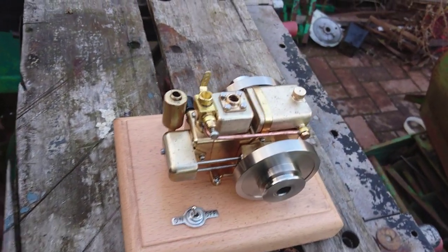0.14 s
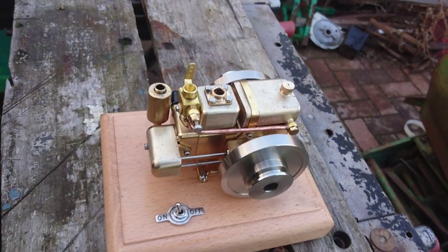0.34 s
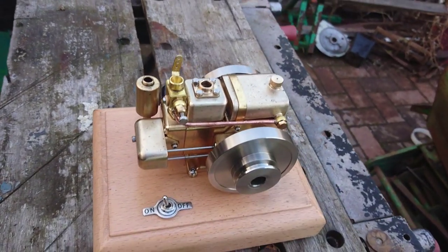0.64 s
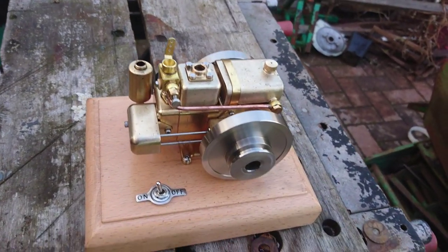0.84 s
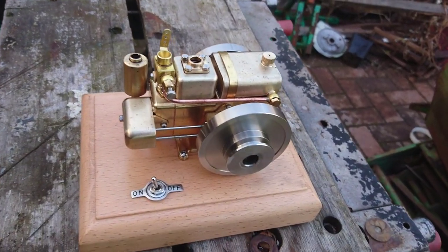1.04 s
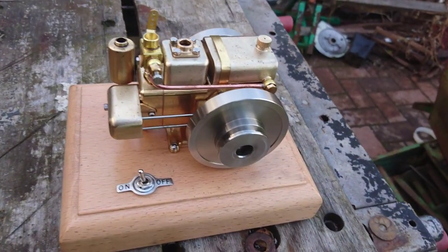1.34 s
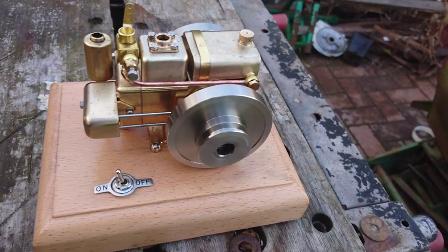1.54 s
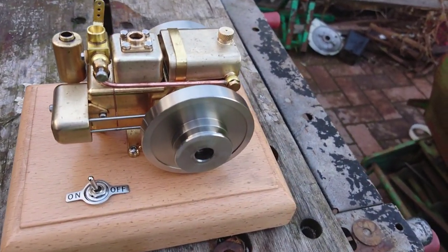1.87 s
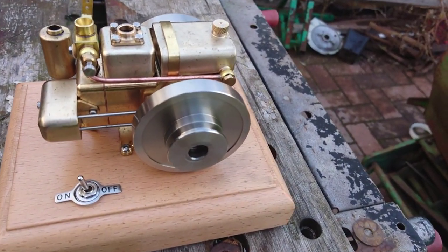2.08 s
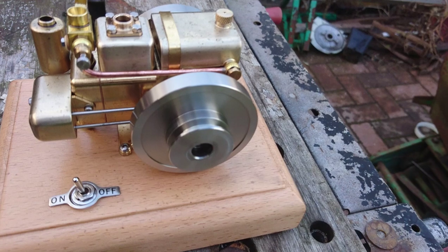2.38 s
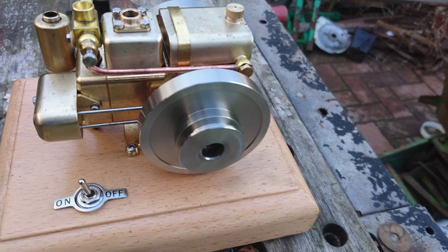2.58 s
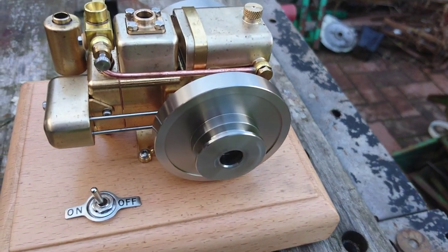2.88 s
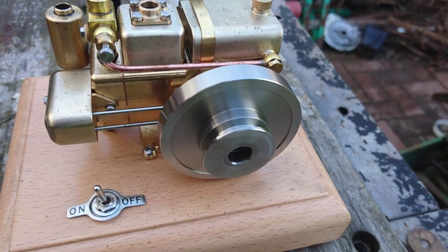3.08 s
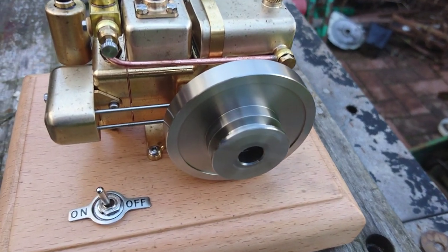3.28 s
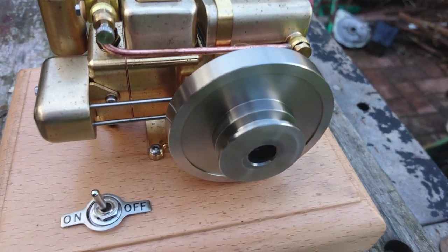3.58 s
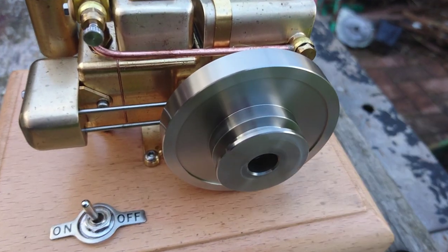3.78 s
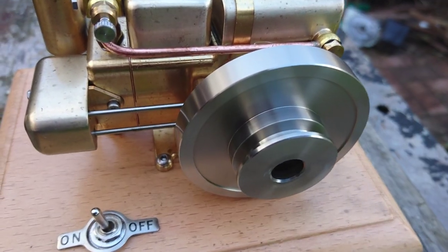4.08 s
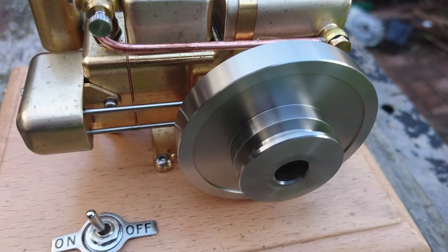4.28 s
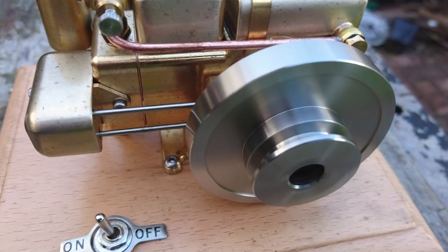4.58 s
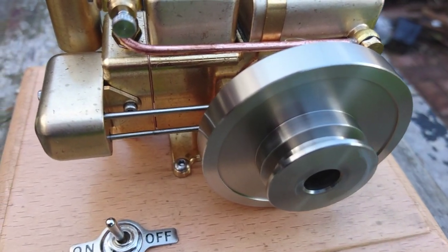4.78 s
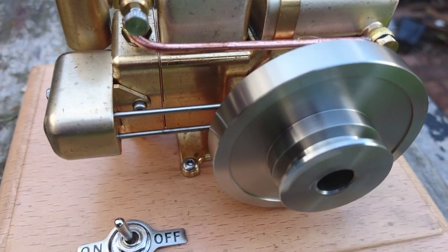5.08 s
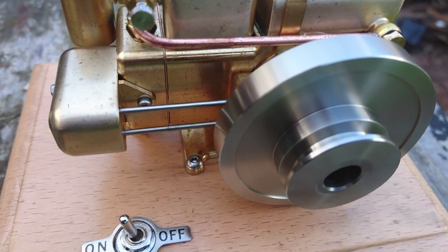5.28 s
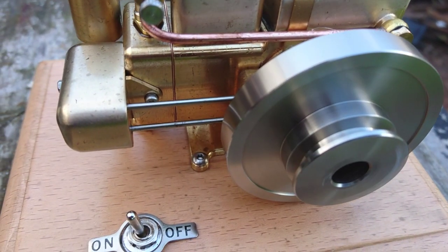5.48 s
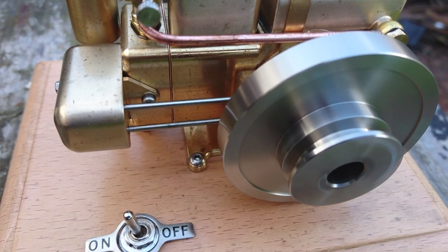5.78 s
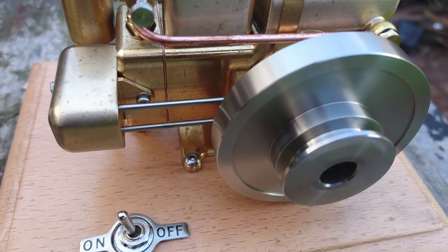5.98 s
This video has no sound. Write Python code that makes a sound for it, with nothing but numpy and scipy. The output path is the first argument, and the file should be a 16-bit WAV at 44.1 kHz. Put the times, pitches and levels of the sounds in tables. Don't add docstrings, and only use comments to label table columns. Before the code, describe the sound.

A small model engine idles on a wooden base outdoors, already running. Sharp, dry exhaust pops come irregularly, about four a second, over a steady rattle of valve knocks and ticks at roughly fifteen cycles a second, with short air hisses, soft gulps and gear whirr. It sits to the left and grows louder and brighter as the small handheld microphone moves in. Faint wind rumble and distant hush lie beneath.

```python
import sys
import numpy as np
from scipy import signal
from scipy.fft import rfft, irfft, next_fast_len
from scipy.io import wavfile
from scipy.ndimage import map_coordinates

SR = 44100
rng = np.random.default_rng(int(sys.argv[2]) if len(sys.argv) > 2 else 0)


def store_wav(level_fs):
    pcm = np.round(np.clip(np.atleast_2d(level_fs), -1, 1) * 32767)
    wavfile.write(sys.argv[1], SR, pcm.T.astype(np.int16))


def volts_from_db(level):
    exponent = np.asarray(level, float) / 20
    return 10 ** exponent


N = 270333

# (frequency [Hz], density [dB per Hz])
FAR_NOISE = [(30, 0), (120, -22), (250, -12), (600, -2), (2000, -20), (6000, -16.5), (10000, -23.5),
             (15500, -25)]
# (time [s], rumble [dB])
WIND_GUSTS = [(0.0, -59), (0.49, -61.5), (0.73, -50.5), (0.92, -56), (1.1, -51), (1.5, -59.5), (1.69, -60),
              (2.3, -68), (2.58, -58), (3.19, -62.5), (3.76, -58), (4.2, -55.5), (4.52, -63), (5.09, -58.5),
              (5.51, -56), (6.13, -62)]
# (frequency [Hz], density [dB per Hz])
WIND_COLOUR = [(20, -40), (40, 1.5), (55, 1), (90, -6.5), (120, -22), (200, -13), (500, -59), (2000, -58)]
# (frequency [Hz], 60 dB decay [s])
YARD_DECAY = [(200, 0.15), (2000, 0.19), (10000, 0.0087)]
# (time [s], gear whirr [dB], left-right [dB], nearness [dB])
APPROACH = [
    (0.0, -55.5, 3.5, -5),
    (0.41, -56.5, 3.5, -5),
    (1.71, -53.5, 5.5, -4),
    (2.06, -53.5, 7, -3.5),
    (2.59, -51, 6.5, -3),
    (4.06, -49, 8, -0.5),
    (4.27, -49.5, 8.5, 0),
    (5.51, -50, 9, 0.5),
    (5.58, -51.5, 8.5, 0.5),
    (6.13, -49.5, 7, -0.5),
]
# (frequency [Hz], density [dB per Hz])
GEAR_COLOUR = [(300, -19), (1000, -10.5), (1350, -13.5), (1720, -2.5), (1880, -21.5), (2070, -0.5),
               (2400, -9), (3200, -14.5), (5000, -17), (9000, -35), (16000, -44)]
# (frequency [Hz], density [dB per Hz])
INTAKE_COLOUR = [(500, -30), (1000, -14), (1750, 8), (2600, 0.5), (4000, -5.5), (6000, 2), (9500, -11.5),
                 (12500, -5), (15500, -6.5)]
# (frequency [Hz], density [dB per Hz])
JET_COLOUR = [(800, -7), (2200, -1.5), (3000, 2), (4800, -4), (6200, -7), (7600, -19), (11000, -18),
              (13000, -30), (15300, -14)]
# (time [s], boom [dB], crack [dB], sharpness [dB])
BANGS = [(0.1168, -17, -9, -4), (0.5508, -18, -14, 6), (0.7663, -17.5, -11.5, 3), (1.051, -17, -10.5, -1),
         (1.261, -16, -12, 1.5), (1.5348, -16.5, -10, -3.5), (1.7392, -15, -10, -3),
         (2.089, -15.5, -12, -3), (2.362, -15.5, -9, -2.5), (2.5608, -14.5, -10.5, -1),
         (2.9674, -14.5, -10.5, -3), (3.2354, -14, -9.5, -13.5), (3.4344, -12.5, -9, -6),
         (3.699, -12.5, -10.5, -1.5), (3.8945, -11.5, -9.5, 4), (4.1575, -12, -10, 3),
         (4.5577, -11.5, -9, 4.5), (4.7625, -11, -8.5, -0.5), (5.1156, -12, -11, 4),
         (5.3935, -11, -10, 0.5), (5.5976, -11.5, -7, -0.5), (5.8701, -11, -6.5, -0.5),
         (6.0717, -11, -9, 4.5)]
# (time [s], delay [samples])
PORT_DELAY = [
    (0, 7.8),
    (1.7, 13.5),
    (6.13, 15),
]
# (frequency [Hz], left-right [dB])
BODY_SHADOW = [(80, 10.5), (200, 3.5), (390, 8.5), (620, 10), (1000, 4), (1750, 13.5), (2400, 21.5),
               (3600, 7), (5500, 16.5), (8000, 12), (15000, 11)]
# (frequency [Hz], response [dB])
MIC_RESPONSE = [(20, -24), (45, -8), (110, -2), (250, 0), (13000, 0), (15200, 2.5), (15850, 2.5),
                (16050, -16), (16950, -26), (17150, -80)]

FULL_SCALE = 0.92
LEAD_S = 0.005
FIRED_BEFORE_S, FIRED_AFTER_S = -0.0948, 6.27
USUAL_CYCLE_S = 0.069
DRAG = 5.0
OPENS, SEATS, JITTER_S = 0.266, 0.478, 0.000291
KNEE_S, SOFTER_DB_PER_MS, LATER = 0.069, 1.5, 0.306
GULP_DB, GULP_GROWS, GULP_DB_PER_MS = -25, 1.21, -0.21
RING_SHIFT, RASP_SHIFT = -0.013, 0.022
BASS_HZ, BASS_DB, BASS_GROWS = 110, 2.5, 0.86
SHARP_HZ = 4300
WHISTLE_HZ = 8000
DIP_HZ, DIP_WIDE_HZ, DIP_DB = 1450, 430, -1
FAR_SMEAR, BASE_GROWS = -0.45, 0.6
OPEN_DB, SEAT_DB, KNOCK_GROWS, KNOCK_SCATTER_DB = -17, -18, 1.88, 1.1
HOT_DB = -1.5
CLUMPS_DB, SWAY_DB = 2.8, 0.9


def unit(x):
    return x / np.sqrt(np.mean(x ** 2) + 1e-20)


def along(points, hz):
    f, v = np.transpose(points)
    return np.interp(np.log(hz + 1), np.log(f + 1), v)


def over_time(knots, values):
    return np.interp(np.arange(N) / SR, knots, values)


def curves(rows):
    s, *columns = np.transpose(rows)
    return [over_time(s, column) for column in columns]


def nearness(s):
    return np.interp(s, *np.transpose(APPROACH)[[0, 3]])


def wobble(rate):
    knots = rng.standard_normal(int(N * rate / SR) + 4)
    return map_coordinates(knots, [np.arange(N) * rate / SR])


def filtered(x, response):
    m = next_fast_len(N + 8192)
    return irfft(rfft(x, m) * response(np.fft.rfftfreq(m, 1 / SR)), m)[..., :N]


def noise(spectrum, channels=1):
    return unit(filtered(rng.standard_normal((channels, N)), lambda hz: volts_from_db(along(spectrum, hz))))


def place(starts, db, shape, size=1400):
    first = np.ceil(starts * SR).astype(int)[:, None] + np.arange(size)
    t = np.abs(first / SR - starts[:, None])
    rows = volts_from_db(db)[:, None] * shape(t) * (first >= 0)
    return np.bincount(np.abs(first).ravel(), rows.ravel(), N + SR)[:N]


def bump(t, at, width):
    return np.exp(-0.5 * ((t - at) / width) ** 2)


def ring(peaks, db, hz, swell, power, scatter_db, detune, tail=0, tail_s=1):
    luck = rng.standard_normal((len(peaks), 3))
    pitch = hz * (1 + detune * luck[:, :1])

    def shape(t):
        burst = (t / swell * np.exp(1 - t / swell)) ** power
        ringing_on = tail * t / tail_s * np.exp(1 - t / tail_s)
        return (burst + ringing_on) * np.sin(2 * np.pi * pitch * t + luck[:, 1:2])

    return place(peaks - swell, db + scatter_db * luck[:, 2], shape)


def far_noise():
    return volts_from_db(-60.5) * noise(FAR_NOISE, channels=2)


def wind():
    gusts = noise(WIND_COLOUR, channels=3)
    level_db = curves(WIND_GUSTS)[0] + 2.5 + 2.0 * wobble(14.0)
    return volts_from_db(level_db) * (1.2 * gusts[0] + 0.81 * gusts[1:])


def yard(x):
    hz, t, z = signal.stft(rng.standard_normal((2, SR // 5)), SR, nperseg=256)
    decay = volts_from_db(-60 * t / along(YARD_DECAY, hz)[:, None])
    tail = signal.istft(z * decay, SR, nperseg=256)[1]
    late = np.pad(x, (120, 0))[None]
    echo = signal.fftconvolve(late, tail / np.linalg.norm(tail[0]), axes=1)[:, :N]
    return volts_from_db([[-27], [-32]]) * echo


def crank():
    firings = np.r_[FIRED_BEFORE_S, np.transpose(BANGS)[0], FIRED_AFTER_S]
    rows = []
    for s, gap in zip(firings, np.diff(firings)):
        k = np.arange(round(gap / USUAL_CYCLE_S))
        cycle = (1 + DRAG * (gap / len(k)) ** 2) ** k
        cycle = cycle * gap / cycle.sum()
        rows += zip(s + np.cumsum(cycle) - cycle, cycle, k == 0)
    return np.transpose([row for row in rows if FIRED_BEFORE_S < row[0] < N / SR])


def cams(s, cycle, fired):
    luck = rng.standard_normal((len(s), 4))
    slow = np.maximum(cycle - KNEE_S, 0)
    near = KNOCK_GROWS * nearness(s)
    opens = s + OPENS * cycle + JITTER_S * luck[:, 0]
    seats = s + SEATS * cycle + LATER * slow + JITTER_S * luck[:, 1]
    open_db = OPEN_DB + near + HOT_DB * fired + KNOCK_SCATTER_DB * luck[:, 2]
    seat_db = SEAT_DB + near - SOFTER_DB_PER_MS * slow * 1000 + KNOCK_SCATTER_DB * luck[:, 3]
    return opens, open_db, seats, seat_db


def gears(opens, seats, whirr_db):
    knots = np.transpose([opens - 0.012, seats + 0.0046, seats + 0.013, seats + 0.018]).ravel()
    load_db = over_time(knots, np.tile([-0.4, -0.5, 1.0, -5], len(opens)))
    uneven_db = CLUMPS_DB * wobble(260) + SWAY_DB * wobble(40)
    return volts_from_db(whirr_db + load_db + 5.5 + uneven_db) * noise(GEAR_COLOUR, channels=2)


def intake(opens, seats, near_db):
    knots = np.transpose([opens - 0.0055, opens - 0.0035, opens + 0.00099, seats - 0.004,
                          seats + 0.00033, seats + 0.0063, seats + 0.0064]).ravel()

    def flow(db, grows):
        stroke_db = over_time(knots, np.tile(db, len(opens)))
        return volts_from_db(stroke_db + grows * near_db - 41 + 2.4 * wobble(400) + 1.9 * wobble(8.5))

    air = noise(INTAKE_COLOUR, channels=2)
    high = filtered(air, lambda hz: 1 / (1 + (WHISTLE_HZ / (hz + 1)) ** 8))
    hiss = flow([-22, 5.5, 0.5, 2.5, 7.0, -3, -26], grows=1.01) * (air - high)
    whistle = flow([-35, -13, 3.0, 3.0, 5.5, -24, -40], grows=0.9) * high
    return hiss + whistle


def valves(opens, open_db, seats, seat_db):
    near = nearness(seats)
    smear = 0.5 * volts_from_db(2 * FAR_SMEAR * near)[:, None]
    base = ring(opens, open_db - 5.0 - FAR_SMEAR * near, 1750.5, swell=0.0033, power=8.1,
                scatter_db=0.36, detune=0.0068, tail=smear, tail_s=0.0037)
    base += ring(opens - 0.0008, open_db - 17, 1900, swell=0.002794, power=2.0, scatter_db=2.5, detune=0.02)
    base += ring(opens - 0.001, near - 34, 970, swell=0.002095, power=0.86, scatter_db=1.0, detune=0.029)
    base += ring(seats, seat_db - 2.5, 1833, swell=0.002158, power=7.0,
                 scatter_db=-0.35, detune=0.014, tail=0.27, tail_s=0.003)
    base += ring(seats, seat_db - 16.5, 2044, swell=0.00185, power=1.0, scatter_db=2.0, detune=0.018)
    base += ring(seats, near - 36, 483, swell=0.00075, power=1.0, scatter_db=1.5, detune=0.11)
    # (time [s], level [dB], frequency [Hz])
    ticks = [(opens - 0.0034, -36, 6300), (seats - 0.006, -37, 4300), (opens - 0.0037, -32, 3250),
             (opens - 0.0003, -33, 3500), (seats + 0.0053, -35, 3100), (seats - 0.0003, -28, 5950),
             (seats - 0.0012, -32, 4900), (seats + 0.00127, -33, 6500)]
    for s, db, hz in ticks:
        base += ring(s, near + db, hz, swell=0.000494, power=0.99, scatter_db=2.5, detune=0.042)
    return base


def pipe(t, hz, peak, width, sudden):
    start = 1 / (1 + np.exp((LEAD_S - t) / sudden))
    return start * bump(t - LEAD_S, peak, width) * np.cos(2 * np.pi * hz * (t - LEAD_S) - 0.3)


def cylinder(t):
    t = t - LEAD_S
    cycles = 335 * t * (1 + 39 * t + (39 * t) ** 4 / 5)
    return bump(t, 0.0096, width=0.0044) * volts_from_db(-60 * (t / 0.02) ** 12) * np.cos(2 * np.pi * cycles)


def gulps(s, cycle, fired):
    s, cycle = s[fired == 0], cycle[fired == 0]
    near = nearness(s)
    db = GULP_DB + GULP_GROWS * near + GULP_DB_PER_MS * (cycle - USUAL_CYCLE_S) * 1000

    def slaps(t):
        inrush = bump(t, LEAD_S, width=0.000071) - 0.44 * bump(t, LEAD_S + 0.00048, width=0.0002)
        return inrush + 0.69 * bump(t, LEAD_S + 0.00234, width=0.00015)

    low = place(s - LEAD_S, db + 0.09, lambda t: -pipe(t, 400, peak=0.0012, width=0.004, sudden=0.0012))
    base = ring(s + 0.00273, db - 3 + BASE_GROWS * near, 1702, swell=0.001796, power=0.9,
                scatter_db=2.0, detune=0.008)
    base += ring(s + 0.00194, db - 8.0, 2060, swell=0.00178, power=1.0, scatter_db=1.5, detune=0.036)
    rocker = ring(s - 0.0019, db - 11.0, 3050, swell=0.00028, power=0.63, scatter_db=6.5, detune=0.045)
    return low - place(s - LEAD_S, db + 5.5, slaps) + base + rocker


def jet():
    s, _, crack_db, _ = np.transpose(BANGS)
    rush = lambda t: volts_from_db(-60 * (t / 0.0028) ** 5) + volts_from_db(-11.5 - 60 * t / 0.049)
    return place(s + 0.00031, crack_db - 9, rush) * noise(JET_COLOUR, channels=2)


def bangs(near_db):
    s, boom_db, crack_db, sharp_db = np.transpose(BANGS)
    near = nearness(s)[:, None]

    def boom_shape(t):
        return pipe(t, 402.0, peak=0.00078, width=0.0032, sudden=0.0013) + 0.33 * cylinder(t)

    def push_shape(t):
        return bump(t, LEAD_S, width=0.00009) - 0.45 * bump(t, LEAD_S + 0.00026, width=0.00009)

    def shock_shape(t):
        total = 0
        # (frequency [Hz], gain, 60 dB decay [s])
        for hz, gain, t60 in [(3800, 1.4, 0.0012), (2138, 0.19, 0.023),
                              (2417, 0.19, 0.0076), (5420, 0.15, 0.012)]:
            total = total + gain * volts_from_db(-60 * t / t60) * np.sin(2 * np.pi * hz * (1 + RING_SHIFT * near) * t)
        return total

    boom = place(s - LEAD_S, boom_db + 0.055, boom_shape)
    push = place(s - LEAD_S, boom_db + 10.2, push_shape)
    push = filtered(push, lambda hz: volts_from_db(DIP_DB * bump(hz, DIP_HZ, DIP_WIDE_HZ)))
    shock = place(s + 0.0004166, crack_db + 6.5, shock_shape)
    rasp = np.zeros(N)
    # (delay [s], frequency [Hz], level [dB])
    for lag, hz, db in [(0.001254, 4777, 1.5), (0.001149, 3580, -6.5), (0.001398, 6000, -6)]:
        rasp_db = crack_db + db + np.sign(hz - SHARP_HZ) * sharp_db
        rasp += ring(s + lag, rasp_db, hz * (1 + RASP_SHIFT * near), swell=0.000613, power=5.8,
                     scatter_db=-1.1, detune=0.039)
    bass = filtered(boom + push, lambda hz: 1 / (1 + (hz / BASS_HZ) ** 2))
    boom = boom + (volts_from_db(BASS_DB + BASS_GROWS * near_db) - 1) * bass
    return boom, push, shock, rasp


def right_port(across, pan_db):
    def bend(hz):
        return volts_from_db(-along(BODY_SHADOW, hz)) * np.exp(-1j * 0.5 / (1 + (hz / 900) ** 4))

    delayed = map_coordinates(filtered(across, bend), [np.arange(N) - curves(PORT_DELAY)[0]])
    return volts_from_db(6.5 - pan_db) * delayed


def scene():
    whirr_db, pan_db, near_db = curves(APPROACH)
    cycles = crank()
    opens, open_db, seats, seat_db = cams(*cycles)
    whirr = gears(opens, seats, whirr_db)
    hiss = intake(opens, seats, near_db)
    metal = valves(opens, open_db, seats, seat_db)
    rush = jet()
    boom, push, shock, rasp = bangs(near_db)
    exhaust = boom + gulps(*cycles)
    direct = exhaust + push + shock + rasp + metal
    left = direct + rush[0] + hiss[0] + whirr[0]
    across = exhaust + volts_from_db(-0.5) * push + volts_from_db(-21.0) * shock + volts_from_db(-5.5) * rasp + volts_from_db(-3.5) * metal
    across += 1.08 * rush[0] + 1.9 * rush[1]
    across += 0.047 * hiss[0] + 1.28 * hiss[1]
    across += 0.33 * whirr[0] + 1.54 * whirr[1]
    engine = np.array([left, right_port(across, pan_db)])
    return engine + yard(direct) + wind() + far_noise()


def top_cut(x):
    return signal.sosfilt(signal.butter(12, 17140, fs=SR, output="sos"), x)


def record(dry):
    rounded = dry / (1 + np.abs(dry / FULL_SCALE) ** 8) ** (1 / 8)
    mix = filtered(rounded, lambda hz: volts_from_db(along(MIC_RESPONSE, hz)))
    return top_cut(mix)


dry = scene()
out = record(dry)
store_wav(out)
```